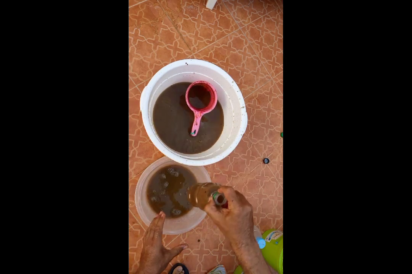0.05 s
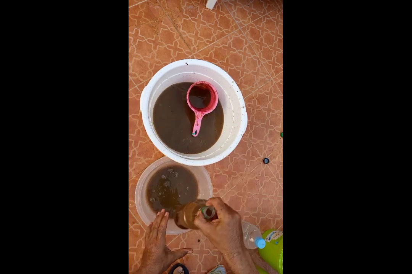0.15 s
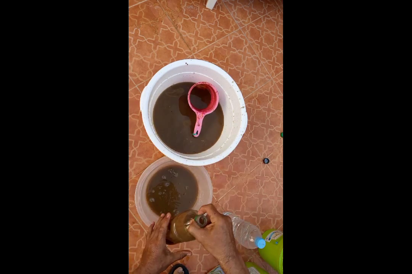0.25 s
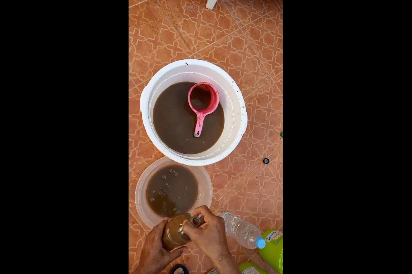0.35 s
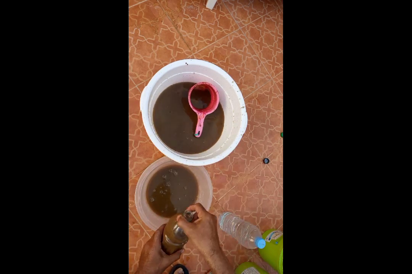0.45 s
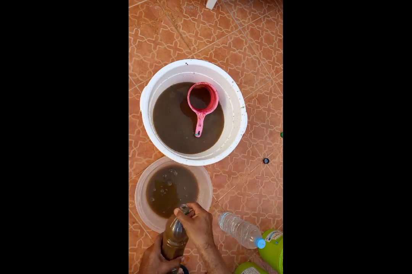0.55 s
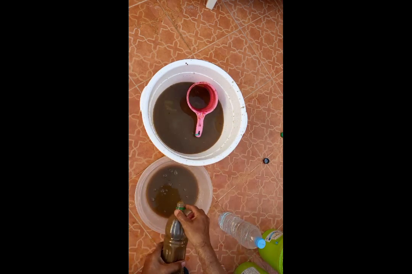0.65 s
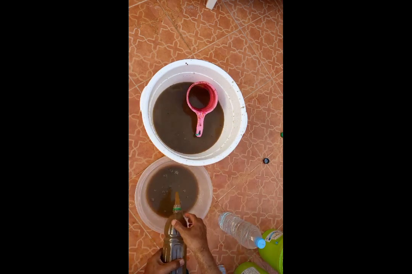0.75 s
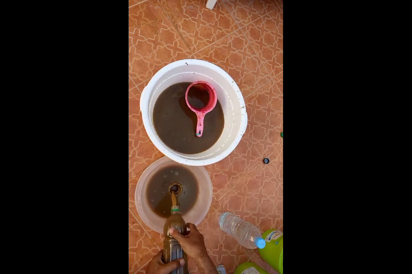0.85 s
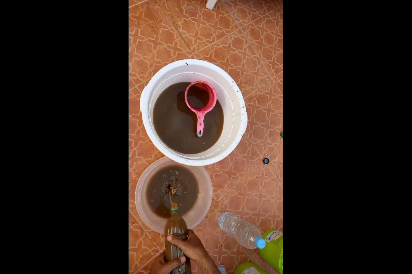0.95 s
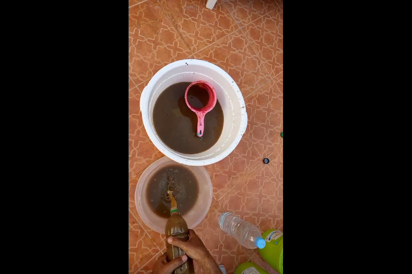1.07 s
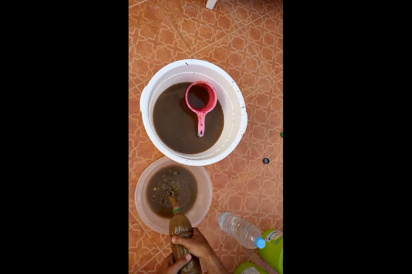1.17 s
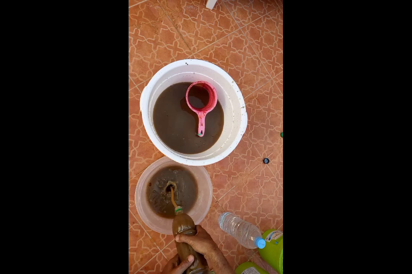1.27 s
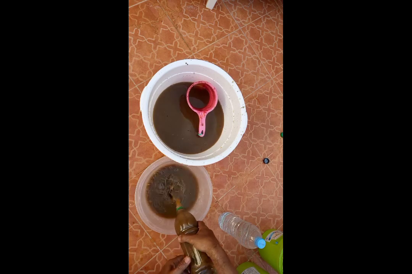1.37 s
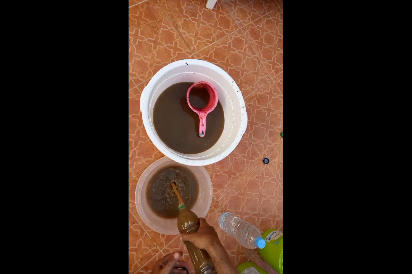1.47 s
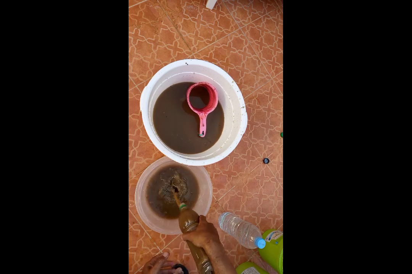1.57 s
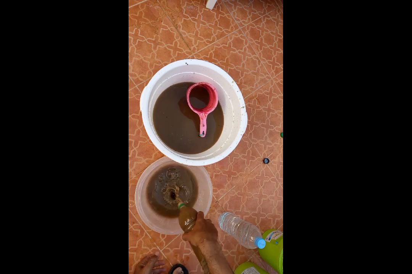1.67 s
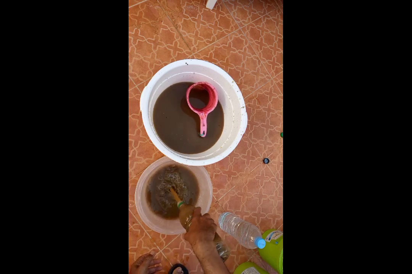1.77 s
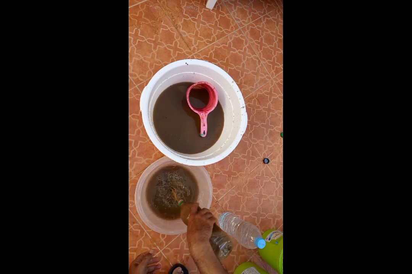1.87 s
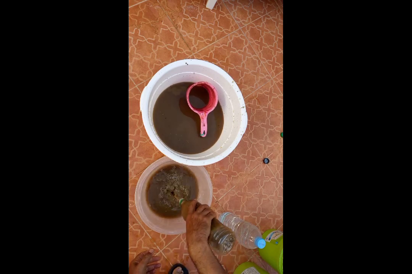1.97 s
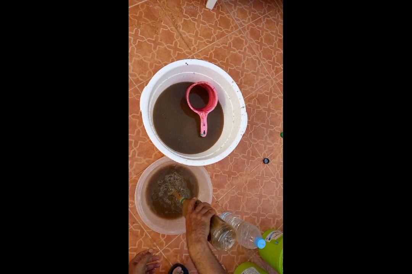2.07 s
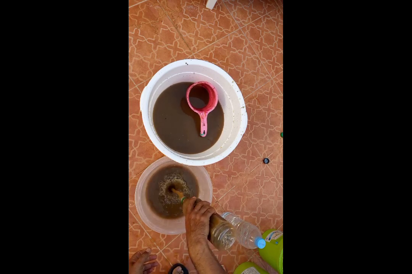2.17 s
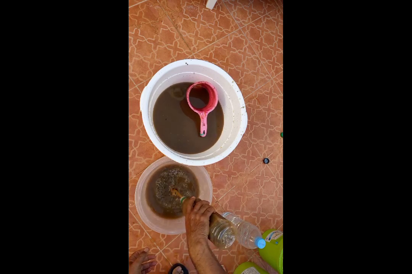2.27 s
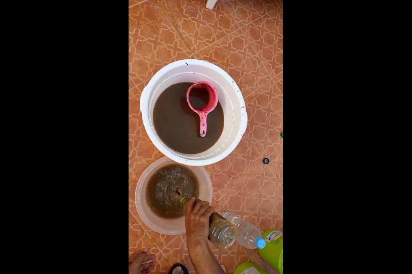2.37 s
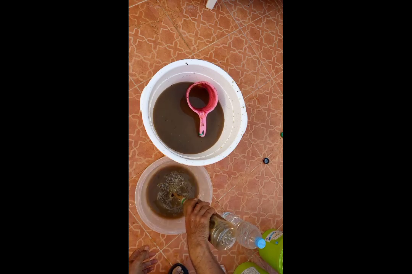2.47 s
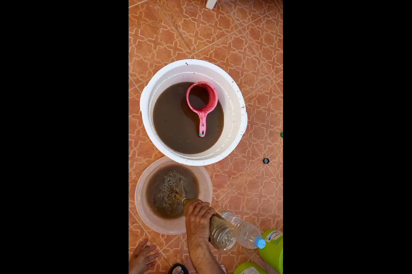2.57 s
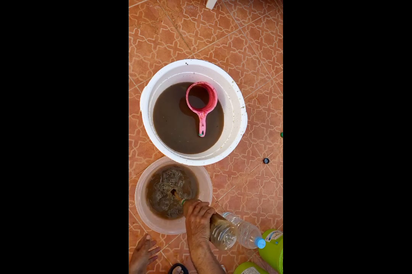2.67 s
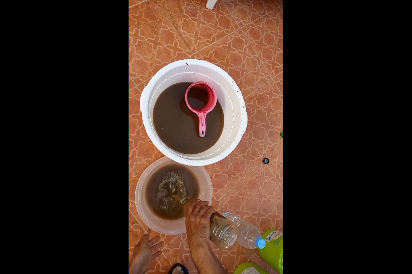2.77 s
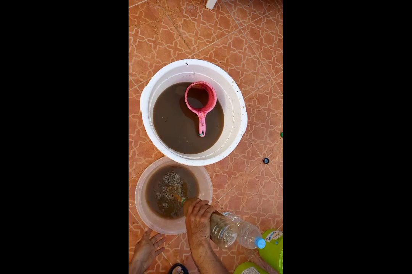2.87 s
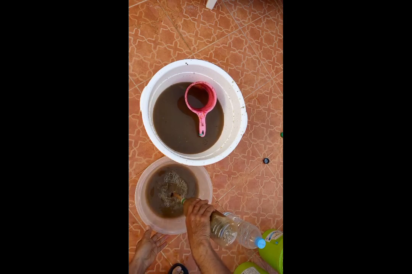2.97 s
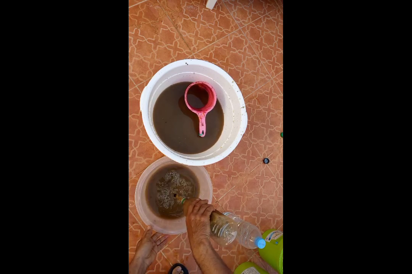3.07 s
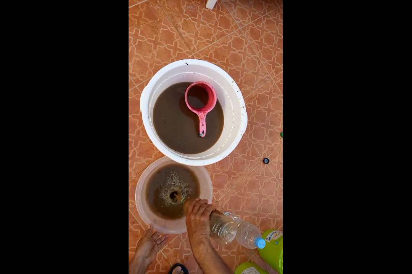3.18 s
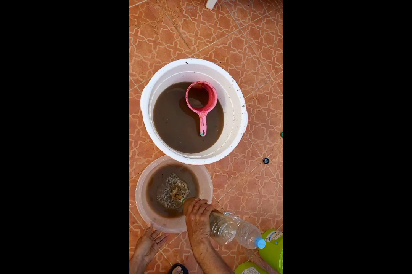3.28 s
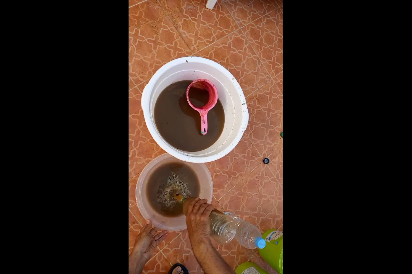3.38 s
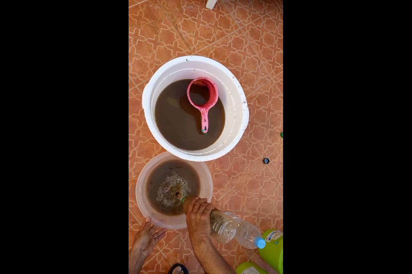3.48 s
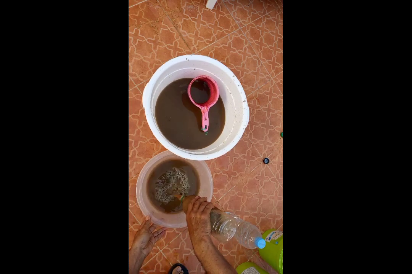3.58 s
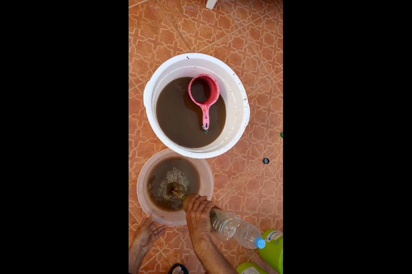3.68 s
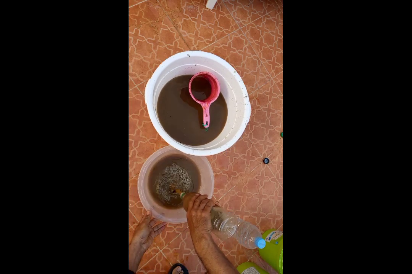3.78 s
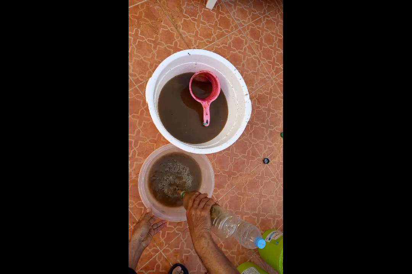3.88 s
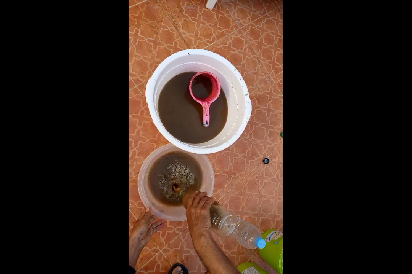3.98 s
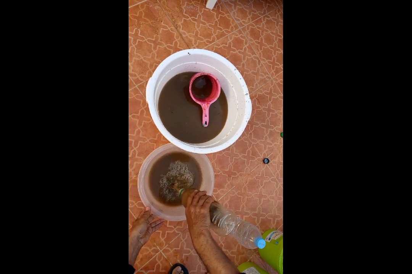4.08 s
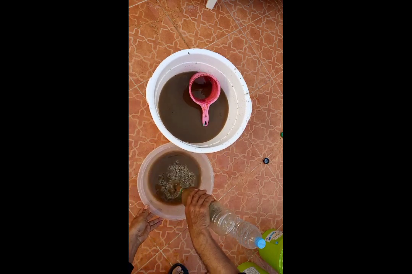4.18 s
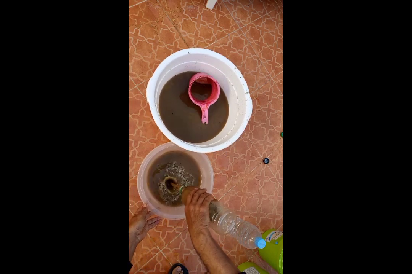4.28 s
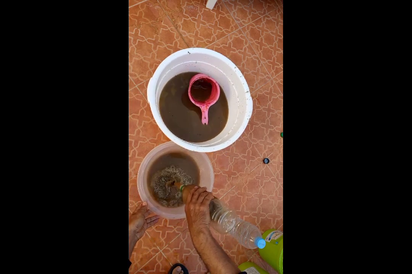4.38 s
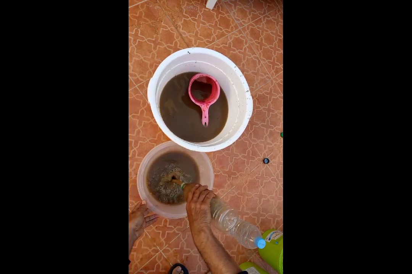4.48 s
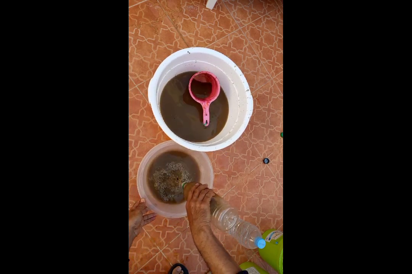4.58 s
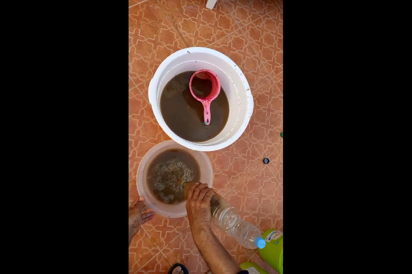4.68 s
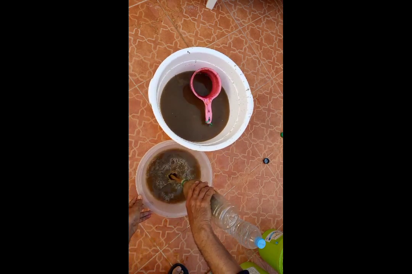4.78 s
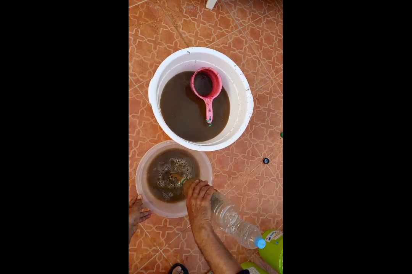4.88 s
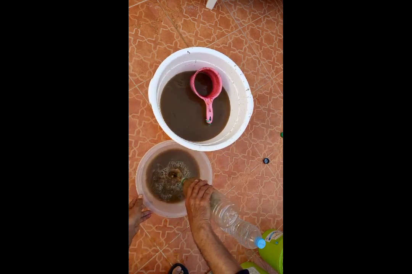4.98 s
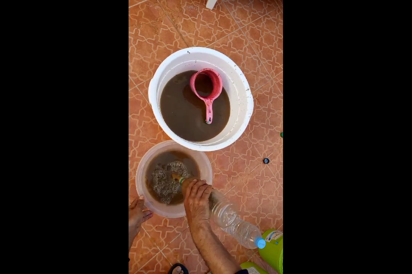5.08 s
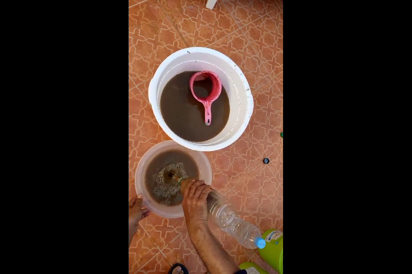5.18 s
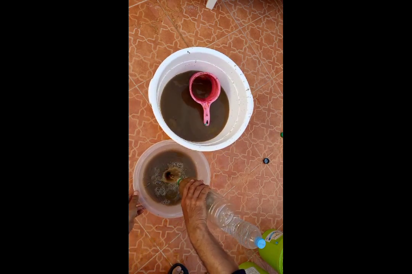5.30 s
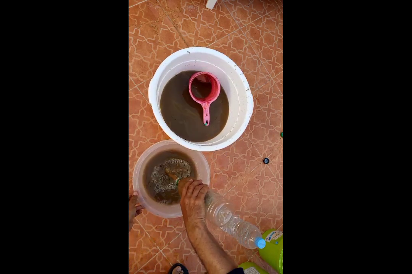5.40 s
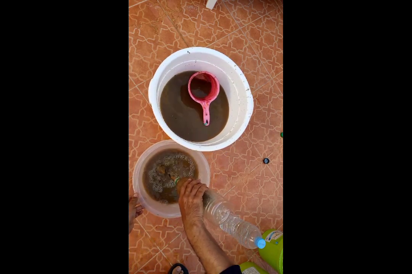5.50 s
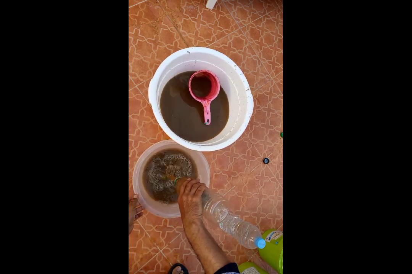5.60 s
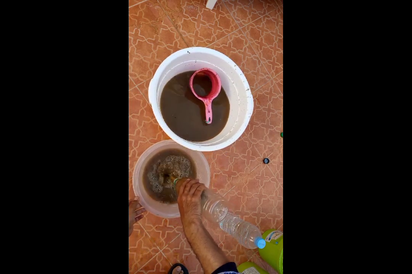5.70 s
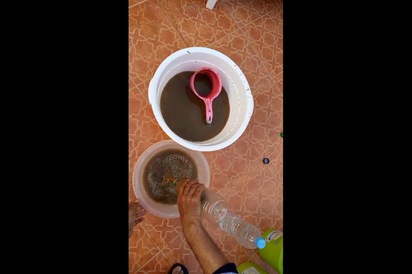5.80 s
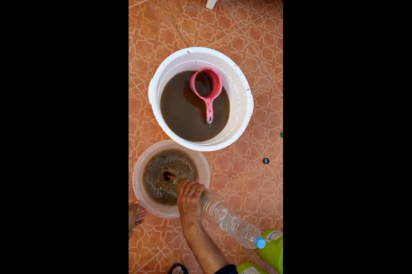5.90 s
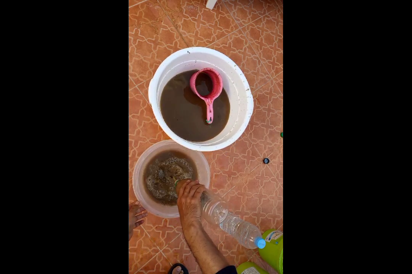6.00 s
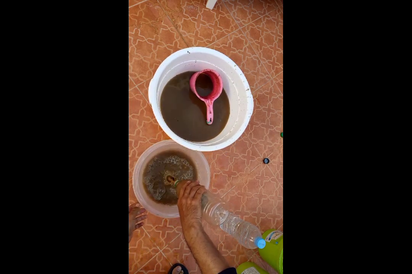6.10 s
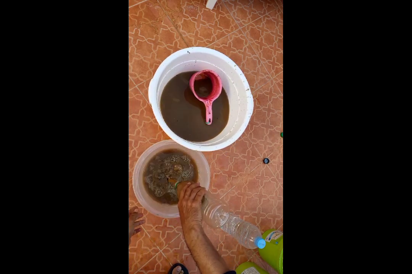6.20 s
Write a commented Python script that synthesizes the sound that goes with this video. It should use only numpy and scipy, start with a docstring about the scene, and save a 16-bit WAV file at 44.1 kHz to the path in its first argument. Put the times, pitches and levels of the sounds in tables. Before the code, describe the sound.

Liquid glugs from plastic bottles into a part-filled plastic basin, splatting and bubbling, with one deep gush midway and a sharp plastic crack later.

```python
"""A faint low hum and the brush and knock of a hand on a plastic bottle lead into a pour.
Liquid then falls in glugs into a part-filled plastic basin on a tiled floor: lumps splat, air pockets gulp
and trapped bubbles ring over a churn of slosh, small bubbles and spray.
Midway it gushes and the basin drums; later the bottle cracks.
Noise is coloured for slosh, spray and bursts; bubbles are dying sines; the basin is pushed resonances."""
import sys
import numpy as np
from scipy import signal
from scipy.fft import rfft, irfft
from scipy.io import wavfile
from scipy.ndimage import uniform_filter1d

SR = 44100
rng = np.random.default_rng(int(sys.argv[2]) if len(sys.argv) > 2 else 0)


def dump(signal):
    """Clip the signal to [-1, 1] and save it as 16-bit WAV at the path in sys.argv[1]."""
    limited = np.clip(np.atleast_2d(signal).T, -1, 1)
    pcm = np.round(limited * 32767).astype(np.int16)
    wavfile.write(sys.argv[1], SR, pcm)


N = 275625
TIME = np.arange(N) / SR


def gain_of(db):
    """Decibels to gain."""
    return 10 ** (np.asarray(db) / 20)


def evened(x):
    """Scales to rms 1."""
    return x / np.sqrt(np.mean(x ** 2) + 1e-20)


def read(points, hz):
    """Reads a table of values against frequency, on a log-frequency axis."""
    f, value = np.transpose(points)
    return np.interp(np.log(hz + 1), np.log(f), value)


def curves(rows):
    """Each column of a timed table, sample by sample."""
    s, *columns = np.transpose(rows)
    return [np.interp(TIME, s, column) for column in columns]


def add(mix, s, sound):
    """Mixes a sound in at time s."""
    part = mix[max(round(s * SR), 0):][:len(sound)]
    part += sound[:len(part)]


def coloured(x, points, size=4096):
    """Causal (minimum-phase) filter of unit energy with the given spectrum."""
    log_gain = np.log(gain_of(read(points, np.fft.rfftfreq(size, 1 / SR))))
    cepstrum = irfft(log_gain)[:size // 2]
    # folding the cepstrum onto positive time makes the filter causal
    cepstrum[1:] *= 2
    taps = irfft(np.exp(rfft(cepstrum, size)))
    return signal.oaconvolve(x, taps / np.linalg.norm(taps))[:len(x)]


def steadied(x, span):
    """Holds the rms near 1 over spans of this many seconds, keeping the finer grain."""
    size = int(span * SR) + 1
    power = abs(uniform_filter1d(uniform_filter1d(x ** 2, size), size))
    return x / np.sqrt(power + 1e-9)


def burst(colour, decay, swell, size=4096):
    """A short turbulent burst that swells and dies; its rms is about 1 over its decay time in seconds."""
    t = np.arange(size) / SR
    envelope = np.exp(-t / decay) * (1 - np.exp(-t / swell))
    x = coloured(rng.standard_normal(size) * envelope, colour)
    return x / np.linalg.norm(x) * np.sqrt(decay * SR)


def bubble(hz, t60, rise, swell_cycles=0.85):
    """A trapped air bubble: a dying sine whose pitch climbs as it nears the surface."""
    t = np.arange(int(t60 * SR) + 2) / SR
    envelope = np.exp(-np.log(1000) * t / t60) * (1 - np.exp(-t * hz / swell_cycles))
    return envelope * np.sin(2 * np.pi * hz * t * (1 + rise * t / t60 / 2))


# Faint hum at the start. Each row: time in seconds, level in dB.
HUM_LEVEL = [(0, -62.5), (.14, -62), (.23, -72), (.33, -98)]
# Colour of the quiet air. Each row: frequency in Hz, relative density in dB per Hz.
AIR_COLOUR = [(30, -15.5), (85, 5), (200, 0.5), (600, -5), (2000, -14.5), (6000, -11.5), (8000, -26.5)]
HUM_HZ, AIR_DB = 156.4, -75


def background():
    """Quiet air as coloured noise, and a low sine hum of faintly wavering pitch that dies away."""
    hum_db, = curves(HUM_LEVEL)
    waver = evened(uniform_filter1d(rng.standard_normal(N), size=3000))
    phase = 2 * np.pi * np.cumsum(HUM_HZ * (1 + 0.005 * waver)) / SR
    hum = np.sqrt(2) * np.sin(phase)
    air = coloured(rng.standard_normal(N), AIR_COLOUR)
    return gain_of(AIR_DB) * air + gain_of(hum_db) * hum


# The hand sliding on the bottle as it is tipped. Each row: time in seconds, level in dB.
SLIDE_LEVEL = [(0, -71), (.12, -79.5), (.25, -78.5), (.42, -65), (.5, -72), (.57, -112), (.65, -100)]
# Colour of that slide. Each row: frequency in Hz, relative density in dB per Hz.
SLIDE_TONE = [(600, -9), (1500, -8.5), (2800, -10), (3350, 3.5), (3900, -9), (4700, -0.5), (5900, -6),
              (7300, -11), (8000, -35)]
# Light knocks of the fingers on the full bottle. Each row: start in seconds, level in dB.
FINGER_KNOCKS = [(0.076, -64.5), (.089, -61), (.362, -70), (0.613, -69.5)]
# What the bottle rings with. Each row: frequency in Hz, relative level in dB, t60 in seconds.
BOTTLE_MODES = [(817, -3, 0.061), (1184, 4, 0.038), (1960, -6, .1)]


def handling():
    """Fingers knock the bottle into dying sine modes and slide on it as coloured noise."""
    out, t = np.zeros(N), TIME[:SR // 4]
    knock = sum(gain_of(db - 60 * t / t60) * np.sin(2 * np.pi * hz * t) for hz, db, t60 in BOTTLE_MODES)
    for s, db in FINGER_KNOCKS:
        add(out, s, gain_of(db) * knock)
    slide_db, = curves(SLIDE_LEVEL)
    return out + gain_of(slide_db) * coloured(rng.standard_normal(N), SLIDE_TONE)


# Lumps of liquid hitting the surface.
# Each row: start in seconds, slap level in dB, tick level in dB before its two offsets, ping pitch in Hz.
LUMPS = [(0.6805, -62.5, -38.5, 4320), (0.694, -65, -49, 5150), (0.7776, -60, -39.5, 3700),
         (0.8814, -35, -34, 3900), (0.8925, -44, -26.5, 6230), (0.9195, -64, -41.5, 3080),
         (0.963, -45.5, -44.5, 5300), (1.014, -46.5, -35, 4750), (1.0307, -51, -33.5, 5200),
         (1.1168, -46.5, -34.5, 6030), (1.142, -62, -36, 5800), (1.1667, -45, -42.5, 5100),
         (1.2185, -58, -43, 6200), (1.2303, -55, -38, 4820), (1.3102, -45, -37.5, 4080),
         (1.3294, -40, -38, 5260), (1.4, -60, -39, 5630), (1.4099, -56, -41.5, 5900),
         (1.441, -57, -40.5, 4500), (1.4676, -52.5, -38.5, 4900), (1.496, -50, -34, 4500),
         (1.53, -48, -41.5, 2900), (1.548, -41, -34.5, 3820), (1.672, -52, -37, 5500),
         (1.746, -57, -36.5, 4460), (1.895, -63, -41, 6770), (1.9739, -46, -39, 4860),
         (2.196, -41, -36.5, 6800), (2.209, -43, -33.5, 6140), (2.331, -51.5, -36.5, 6400),
         (2.3622, -61, -39.5, 6100), (2.3748, -56, -43, 4880), (2.4076, -53.5, -41, 4770),
         (2.4605, -45.5, -39.5, 5500), (2.531, -44.5, -34, 3840), (2.6681, -54, -38, 5620),
         (2.7288, -43, -29.5, 4820), (2.7424, -55, -26, 5940), (2.9215, -46, -35.5, 5970),
         (3.022, -44, -37.5, 5300), (3.055, -50, -37, 6200), (3.1227, -35, -35, 5900),
         (3.6816, -49, -27.5, 6040), (3.9263, -60, -39, 6240), (3.942, -53, -27.5, 5040),
         (4.038, -41.5, -32.5, 5810), (4.2387, -53, -35.5, 6540), (4.322, -54, -38.5, 4700),
         (4.3337, -51, -35.5, 5870), (4.385, -42, -37, 5700), (4.5168, -57, -37.5, 6070),
         (4.585, -40, -32, 5620), (4.6381, -35, -63, 3860), (4.77, -58, -29.5, 5720),
         (4.7991, -53, -37, 6000), (4.8369, -39.5, -27, 5926), (4.871, -62, -37.5, 6100),
         (4.964, -35, -41.5, 5300), (5.138, -55, -34, 6000), (5.1516, -41, -50, 3540),
         (5.1834, -37, -37, 5200), (5.402, -51, -41.5, 5560), (5.5648, -65, -40.5, 5460),
         (5.6496, -45.5, -44.5, 2960), (5.721, -45, -33, 5440), (5.7496, -43.5, -46, 2880),
         (5.9743, -63, -37.5, 5120), (6.021, -49.5, -53, 2950), (6.1239, -70, -34.5, 5630),
         (6.177, -43, -33, 5700), (6.185, -47.5, -40, 2800)]
# Colours of the slap and of all spray. Each row: frequency in Hz, relative density in dB per Hz.
SLAP_COLOUR = [(100, -21.5), (300, -1), (600, -0.5), (1000, -2), (1600, 0), (2600, -4.5), (3500, -7),
               (6000, -41)]
SPRAY_COLOUR = [(1200, -10.5), (2200, -10.5), (3100, 4), (4200, 2.5), (5400, 3), (6500, 4.5), (7200, -3),
                (7800, -15), (9000, -31)]
# a tick is a puff of spray plus the ping of one tiny bubble pinched off by the lump (offsets in dB)
TICK_SPRAY_DB, TICK_PING_DB = -7, 8.5
# the ping's t60 in cycles, and the share by which its pitch rises within that time
PING_CYCLES, PING_RISE = 40, 0.46


def splats():
    """Each lump of liquid slaps the surface, throws a sharp tick of spray and pinches off a tiny bubble."""
    out = np.zeros(N)
    for s, slap_db, tick_db, hz in LUMPS:
        slap = burst(SLAP_COLOUR, decay=0.0039, swell=0.001)
        puff = burst(SPRAY_COLOUR, decay=0.0027, swell=0.00014)
        ping = bubble(hz, PING_CYCLES / hz, PING_RISE, swell_cycles=0.61)
        add(out, s, gain_of(slap_db) * slap)
        add(out, s, gain_of(tick_db + TICK_SPRAY_DB) * puff)
        add(out, s, gain_of(tick_db + TICK_PING_DB) * ping)
    return out


def scatter():
    """Power of the loose drops that land just before and after each lump of liquid."""
    landings = np.zeros(N)
    for s, _, tick_db, _ in LUMPS:
        add(landings, s, gain_of([tick_db]) ** 2)
    t = np.arange(-4096, 4097) / SR
    # a quick build-up before the lump, a slower thinning after it
    around = np.where(t < 0, np.exp(-abs(t) / 0.0012), np.exp(-abs(t) / 0.0061))
    return abs(signal.oaconvolve(landings, around, "same"))


# The bottle empties in glugs.
# Each row: start in seconds, length in seconds, then low slosh, bubbling and spray levels in dB.
GLUG_EVENTS = [(0.686, 0.024, -72, -59.5, -69), (0.84, .17, -70, -54, -51.5),
               (1.106, 0.07, -67, -54.5, -71), (1.264, 0.13, -62, -57, -50.5), (1.5, 0.13, -62, -51.5, -48),
               (1.70, .06, -62, -80, -67), (1.841, .14, -58, -51, -51.5), (2.068, 0.066, -56.5, -58.5, -54),
               (2.201, 0.1, -62, -55, -51), (2.27, 0.046, -86, -55.5, -58),
               (2.504, 0.13, -54, -49.5, -53.5), (2.717, 0.17, -55.5, -50, -50),
               (2.9, 0.16, -77, -53, -53.5), (3.071, 0.1, -57.5, -50.5, -49),
               (4.015, 0.34, -65.5, -45, -53.5), (4.317, 0.13, -47, -44.5, -46),
               (4.457, 0.37, -61, -44.5, -52), (4.61, 0.18, -57, -49.5, -52.5),
               (4.797, 0.13, -69, -53.5, -53), (4.942, .05, -55, -57.5, -48),
               (5.129, 0.21, -64, -44, -49.5), (5.48, .15, -78, -59.5, -56),
               (5.709, .11, -56.5, -55, -57.5), (5.941, 0.13, -60, -51.5, -53.5),
               (6.16, 0.11, -64.5, -58, -52)]
# A thin trickle keeps running under the glugs. Columns: low slosh, bubbling and spray in dB,
# all shifted by the trickle's own level.
TRICKLE_LAYERS_DB = (-72, -59, -58.5)
# It starts as the bottle tips and thins as it empties. Each row: time in seconds, level shift in dB.
TRICKLE_LEVEL = [(.72, -41), (.81, -5.5), (.95, -2), (2.4, -3), (2.5, -8), (2.6, 0), (4.98, 1.5),
                 (5.08, -1), (5.4, 0.5), (5.7, -2), (5.9, -9), (6.25, -5.5)]
# The one long gush, when air flows freely into the bottle.
# Each row: time in seconds, then low slosh, bubbling and spray levels in dB.
GUSH_LEVELS = [(3.19, -57, -54, -51), (3.25, -54, -39, -46), (3.36, -55.5, -37.5, -42.5),
               (3.45, -53.5, -39.5, -43.5), (3.56, -54.5, -43, -48.5), (3.66, -52, -37.5, -46),
               (3.72, -45, -31.5, -42), (3.79, -38, -33, -44), (3.87, -47, -36.5, -46),
               (4.0, -65, -64, -68)]
# each glug swells, sags as the bottle chokes for air, then settles
GLUG_ATTACK_S, GLUG_SAG_DB, GLUG_SETTLE_S = 0.014, -2, 0.028


def flow():
    """Levels of slosh, bubbling and spray in dB: the trickle, the glugs and the gush add in power."""
    trickle = gain_of(curves(TRICKLE_LEVEL)[0])
    power = np.outer(gain_of(TRICKLE_LAYERS_DB), trickle) ** 2
    for start, length, *levels_db in GLUG_EVENTS:
        t = TIME[:int((length + .2) * SR)]
        swell = np.minimum(t / GLUG_ATTACK_S, 1) * gain_of(GLUG_SAG_DB * t / length)
        settle = np.exp(-np.maximum(t - length, 0) / GLUG_SETTLE_S)
        for layer, db in zip(power, levels_db):
            add(layer, start, (gain_of(db) * swell * settle) ** 2)
    gushing = (TIME > GUSH_LEVELS[0][0]) * (TIME < GUSH_LEVELS[-1][0])
    power += gain_of(curves(GUSH_LEVELS)) ** 2 * gushing
    return 10 * np.log10(power + 1e-14)


def cloud(low_hz, high_hz, per_s, spread_db, cycles, climb, count=200):
    """A swarm of bubbles of many sizes, born at random; most are faint, a few strong."""
    out = np.zeros(N)
    chance, kind = rng.random(N) * SR / per_s, rng.integers(0, count, N)
    born = np.flatnonzero(chance < 1)
    sizes = gain_of(spread_db * np.minimum(-np.log(chance[born]), 4)) * (-1) ** born
    for k, hz in enumerate(np.linspace(low_hz, high_hz, count)):
        life, rise = rng.uniform(0.23, 2.15), rng.uniform(0, climb)
        ring = bubble(hz, life * cycles / hz, rise)
        ring = ring / np.linalg.norm(ring)
        alike = kind[born] == k
        at = born[alike, None] + np.arange(len(ring))
        np.add.at(out, np.minimum(at, N - 1).ravel(), np.outer(sizes[alike], ring).ravel())
    return evened(out)


def patchy(x, depth_db, frames=16, bins=7):
    """Bubbles of like size come in short-lived clusters, so the colour shifts from moment to moment."""
    z = signal.stft(x, SR, nperseg=256)[2]
    clusters = uniform_filter1d(rng.standard_normal(z.shape), frames, 1)
    clusters = evened(uniform_filter1d(clusters, bins, 0))
    return signal.istft(z * gain_of(depth_db * clusters), SR, nperseg=256)[1][:N]


# Colours of the slosh, of the bubbling and of the full gush, where the bubbles merge.
# Each row: frequency in Hz, relative density in dB per Hz.
SLOSH_COLOUR = [(30, -43.5), (60, -13), (110, 2.5), (200, -2.5), (330, -1), (420, 1.5), (600, -17.5),
                (1200, -60.5)]
BUBBLING_COLOUR = [(250, -39.5), (380, -10.5), (470, 3.5), (610, -0.5), (730, -5.5), (840, -4.5),
                   (1050, -6.5), (1400, -3.5), (1900, -4.5), (2500, -15), (3300, -31), (6000, -68.5)]
ROAR_COLOUR = [(150, -39), (300, -11), (450, -8.5), (600, 3), (720, -4), (830, -1), (1020, -10.5),
               (1400, -5.5), (1900, -15), (2500, -26), (3500, -29), (6000, -43)]


def churn():
    """The stream stirs up slosh, bubbles and spray; the stronger it runs, the denser the swarm."""
    slosh_db, bubbling_db, spray_db = flow()
    crowd = np.clip(gain_of(.9 * (bubbling_db + 53)), .6, 5)
    slosh = steadied(coloured(rng.standard_normal(N), SLOSH_COLOUR), 0.063)
    bubbling = cloud(383.2, 2716, 800 * crowd, spread_db=3.5, cycles=38, climb=0.39)
    bubbling = bubbling + gain_of(-12) * rng.standard_normal(N)
    bubbling = steadied(coloured(patchy(bubbling, depth_db=5.5), BUBBLING_COLOUR), 0.024)
    spray = cloud(2187, 7630, 900 * crowd, spread_db=5.5, cycles=67, climb=0.32)
    spray = spray + gain_of(-8.5) * rng.standard_normal(N)
    spray = steadied(coloured(patchy(spray, depth_db=3.5), SPRAY_COLOUR), 0.025)
    # in a full gush the single bubbles merge into a smooth roar and hiss
    merged = np.clip((bubbling_db + 48.0) / 12, 0, .8)
    roar = steadied(coloured(rng.standard_normal(N), ROAR_COLOUR), 0.1)
    hiss = coloured(rng.standard_normal(N), SPRAY_COLOUR)
    body = np.sqrt(1 - merged) * bubbling + np.sqrt(merged) * roar
    fizz = np.sqrt(1 - merged) * spray + np.sqrt(merged) * hiss
    # the loose drops around each lump add to the spray in power
    spray_gain = np.hypot(gain_of(spray_db), gain_of(-11.5) * np.sqrt(scatter()))
    return gain_of(slosh_db) * slosh + gain_of(bubbling_db) * body + spray_gain * fizz


# Single bubbles that ring out. Each row: start in seconds, level in dB, pitch in Hz, t60 in seconds,
# share by which the pitch rises within t60.
RINGING_BUBBLES = [(0.695, -48.5, 448, .15, 0.18), (0.8326, -31.5, 1490, 0.014, 0.31),
                   (0.8717, -36, 3260, 0.023, 0.18), (0.9954, -31, 1510, 0.015, 0.78),
                   (1.03, -35, 2300, .022, 0.12), (1.2283, -28, 3440, 0.013, 0.4),
                   (1.2568, -35.5, 695, 0.028, 0), (1.411, -30, 1730, 0.012, 0.066),
                   (1.6836, -32, 3580, 0.03, 0.33), (1.7163, -25, 4850, .012, 0.54),
                   (1.751, -40.5, 1055, 0.049, 0.75), (1.7525, -28.5, 3880, 0.018, 0.65),
                   (1.8586, -30, 278, 0.039, 0), (1.867, -29, 530, 0.017, 0.13),
                   (1.9369, -31.5, 547, .1, 0.047), (1.965, -37.5, 533, 0.12, .1),
                   (2.0871, -28.5, 1585, 0.027, 0.71), (2.0876, -28.5, 2140, 0.013, 0.9),
                   (2.1453, -31, 1430, 0.0081, 0.13), (2.1612, -33, 5120, 0.018, 0.14),
                   (2.5317, -28.5, 462, 0.075, 0.34), (2.615, -41, 406, 0.078, 0.03),
                   (2.743, -30.5, 1830, 0.021, 0), (2.776, -18, 1450, 0.011, .1),
                   (2.978, -31.5, 1784, 0.031, 0.65), (3.1639, -27, 385, 0.025, 0.07),
                   (3.9468, -25.5, 434, 0.051, 0.46), (4.0353, -15.5, 697, 0.012, 0),
                   (4.101, -34, 645, 0.046, 0), (4.2804, -37, 558, 0.072, .8),
                   (4.961, -31.5, 513, 0.051, 0), (5.0814, -32, 5780, .012, 0.12),
                   (5.3416, -31.5, 494, 0.042, 0.18), (5.6403, -33, 4060, 0.013, 0.092),
                   (5.6946, -30, 4590, 0.019, 0), (5.7448, -29, 425, .022, 0.13),
                   (5.783, -34, 3100, 0.021, 0.4), (5.8237, -40.5, 1470, 0.05, 0.21),
                   (5.838, -43, 581, .14, 2.15), (5.8628, -31.5, 5050, 0.014, 0.3),
                   (5.9154, -31.5, 3660, 0.011, 0.63), (6.062, -45.5, 515, 0.19, 0.66),
                   (6.23, -36.5, 2090, 0.057, 0.37), (6.232, -36.5, 440, 0.11, 0.46)]


def plinks():
    """Single trapped bubbles ring out over the churn as dying sines."""
    out = np.zeros(N)
    for s, db, hz, t60, rise in RINGING_BUBBLES:
        add(out, s, gain_of(db) * bubble(hz, t60, rise))
    return out


# Air pockets collapsing under the stream. Each row: start in seconds, level in dB.
AIR_POCKETS = [(0.879, -47), (1.265, -47), (1.327, -47), (1.54, -46.5), (1.703, -50.5), (1.8, -50),
               (2.04, -52), (2.082, -47), (2.205, -53.5), (2.412, -52), (2.534, -52.5), (2.677, -47),
               (2.776, -43.5), (3.124, -42.5), (4.395, -44), (4.689, -41), (4.828, -46), (4.961, -42),
               (5.133, -41), (5.182, -38), (5.321, -46), (5.973, -41.5), (6.121, -47.5)]
# Colour of a gulp. Each row: frequency in Hz, relative density in dB per Hz.
GULP_COLOUR = [(30, -22.5), (70, -11.5), (130, -1.5), (250, 4), (380, 2), (550, 1), (1000, -25),
               (3000, -72)]


def gulps():
    """Collapsing air pockets give soft low thuds, made as short bursts of dark noise."""
    out = np.zeros(N)
    for s, db in AIR_POCKETS:
        add(out, s, gain_of(db) * burst(GULP_COLOUR, decay=0.0095, swell=0.00082))
    return out


def ringing(hz, width):
    """A resonance, its width in Hz, kept ringing by random pushes."""
    pole = np.exp((2j * np.pi * hz - np.pi * width) / SR)
    pushes = rng.standard_normal(N)
    return steadied(signal.lfilter([1], np.poly([pole, pole]), pushes).real, 0.062)


# The basin drumming under the gush.
# Each row: time in seconds, level of the lowest mode in dB, level of the upper modes in dB.
DRUMMING_LEVELS = [(3.3, -71, -74), (3.45, -49, -76.5), (3.62, -49.5, -77), (3.7, -45.5, -31.5),
                   (3.78, -43.5, -31), (3.98, -60, -40), (4.06, -67.5, -66), (4.7, -83, -72),
                   (5.2, -99, -82)]
# Upper modes of the basin. Each row: frequency in Hz, width in Hz, relative level in dB.
UPPER_MODES = [(158.2, 9.1, -14.5), (214.4, 22, -20)]


def basin():
    """The gush reaches the thin plastic bottom and sets its modes drumming."""
    lowest_db, upper_db = curves(DRUMMING_LEVELS)
    lowest = ringing(hz=76.6, width=2.4)
    upper = sum(gain_of(db) * ringing(hz, width) for hz, width, db in UPPER_MODES)
    drumming = gain_of(lowest_db) * lowest + gain_of(upper_db) * upper
    return drumming * (TIME > DRUMMING_LEVELS[0][0])


# The thin bottle wall snaps in and out with a sharp crack. Each row: start in seconds, level in dB.
WALL_SNAPS = [(5.1854, -23.5), (5.1899, -22)]
# Colour of that crack. Each row: frequency in Hz, relative density in dB per Hz.
CRACK_COLOUR = [(300, -16), (1500, -6), (2800, -10), (4200, -5.5), (5600, 4), (6600, 5), (8000, -20)]


def cracks():
    """The plastic buckles: very short, bright snaps of noise."""
    out = np.zeros(N)
    for s, db in WALL_SNAPS:
        add(out, s, gain_of(db) * burst(CRACK_COLOUR, decay=0.00082, swell=.0001))
    return out


# The tiled space. Each row: frequency in Hz, t60 in seconds.
ROOM_DECAY = [(100, 0.043), (500, 0.073), (2000, 0.57), (7000, 0.15)]


def room(x, size=16384):
    """Dense reflections from tiles and walls, each band dying at its own speed."""
    # about 2500 random reflections per second, none in the first 4 ms
    taps = rng.standard_normal(size) * (rng.random(size) < 2500 / SR) * (TIME[:size] > .004)
    hz, t, z = signal.stft(taps, SR, nperseg=256)
    decay = gain_of(-60 * t / read(ROOM_DECAY, hz)[:, None])
    tail = signal.istft(z * decay, SR, nperseg=256)[1]
    return signal.oaconvolve(x, tail / np.linalg.norm(tail))[:N]


def scene():
    """The pour, close by, with a little room; the basin and background stay dry."""
    pour = handling() + splats() + churn() + plinks() + gulps() + cracks()
    return (pour + gain_of(-14) * room(pour) + basin() + background())[None]


EDGE_HZ = 8150


def record(dry):
    """A narrow-band microphone with a steep upper edge, made as a low-pass filter."""
    low_pass = signal.firwin(201, EDGE_HZ, window=("kaiser", 8), fs=SR)
    return signal.oaconvolve(dry, low_pass[None], "same")


dry = scene()
out = record(dry)
dump(out)
```